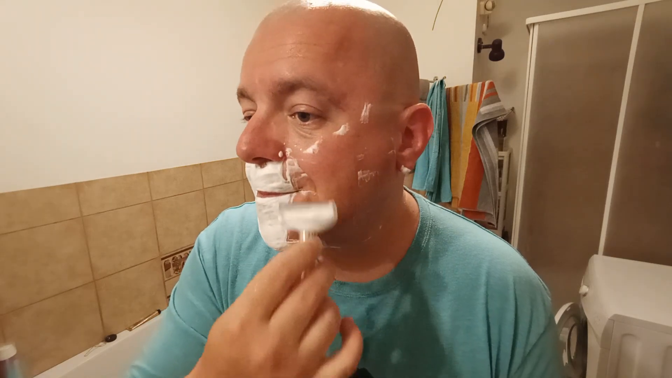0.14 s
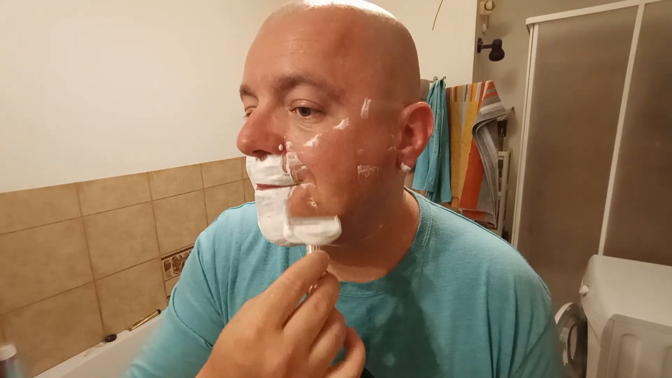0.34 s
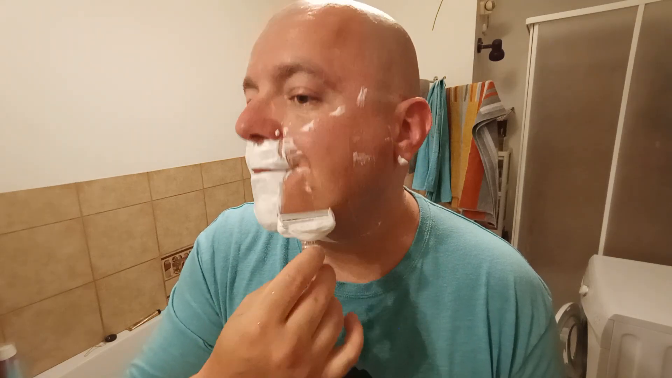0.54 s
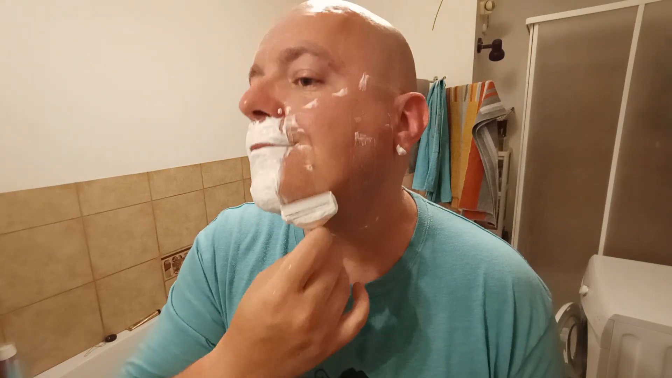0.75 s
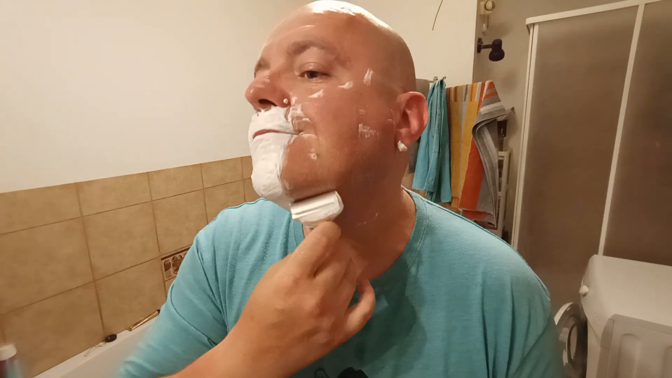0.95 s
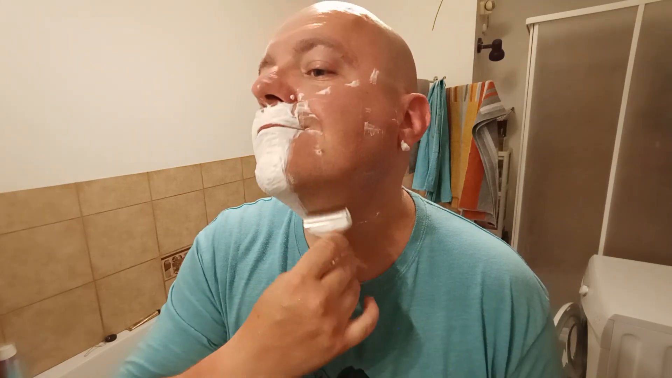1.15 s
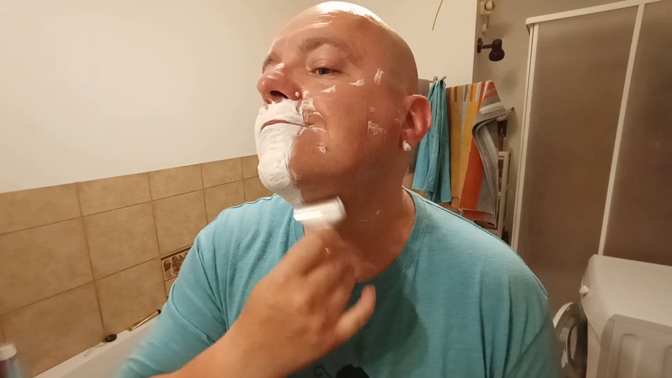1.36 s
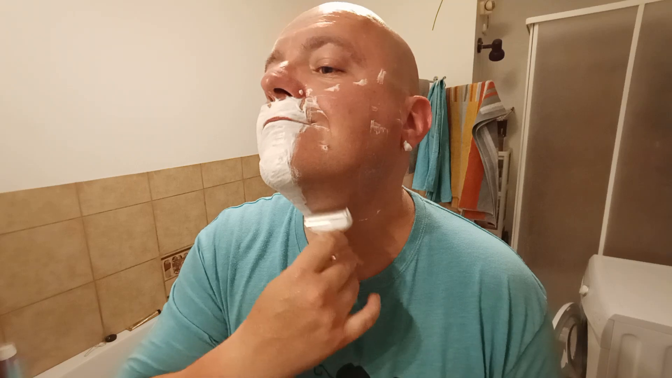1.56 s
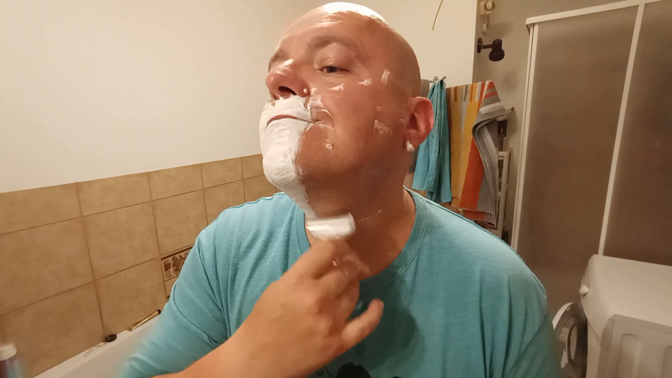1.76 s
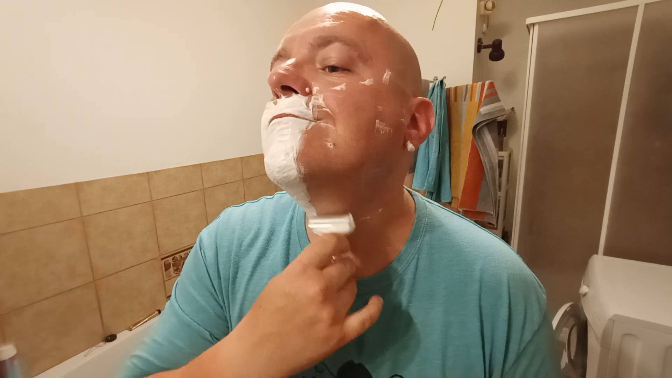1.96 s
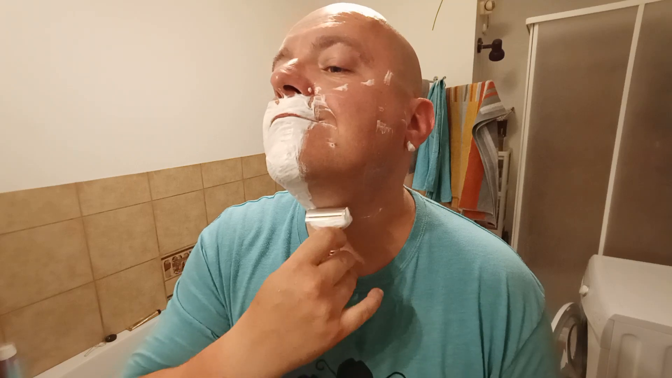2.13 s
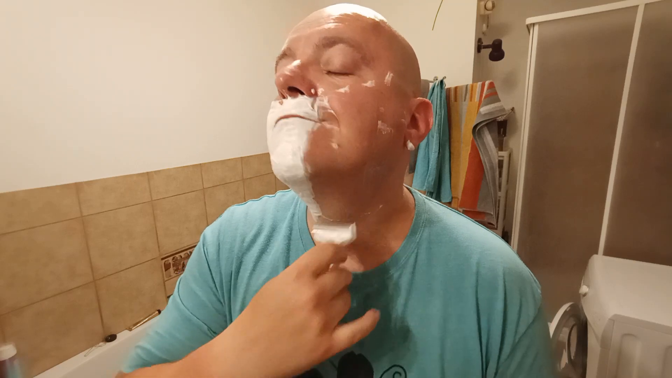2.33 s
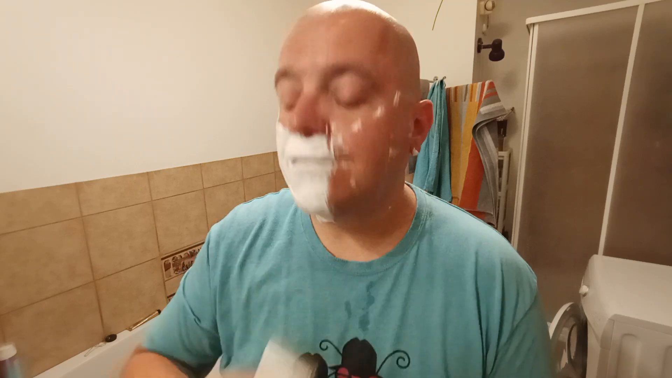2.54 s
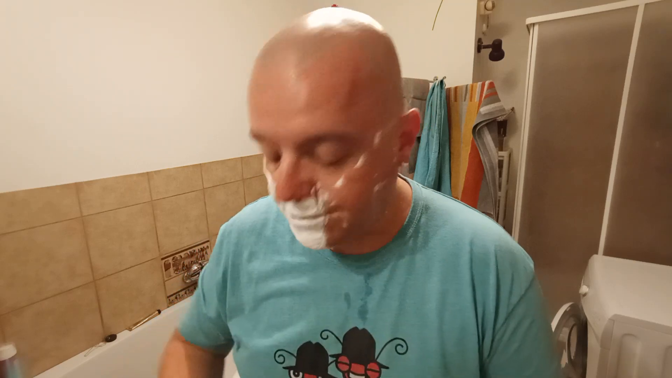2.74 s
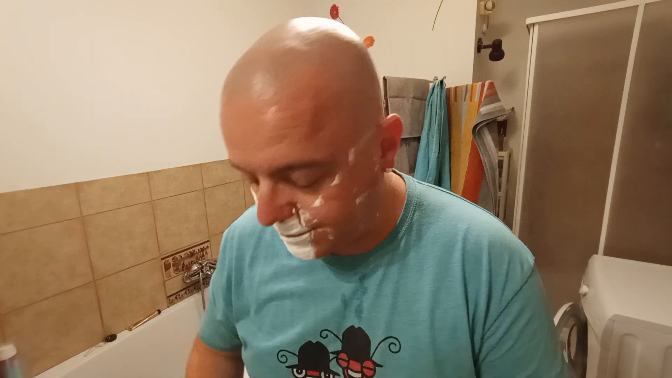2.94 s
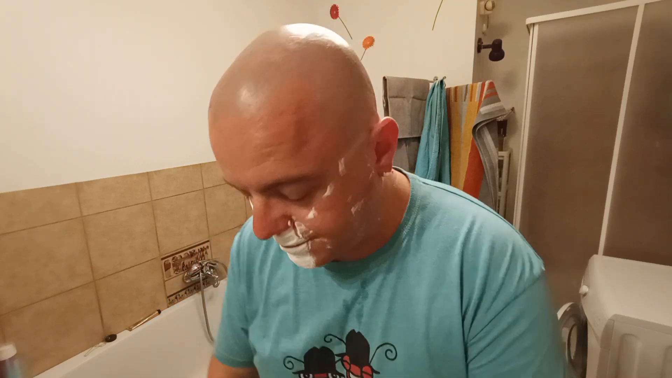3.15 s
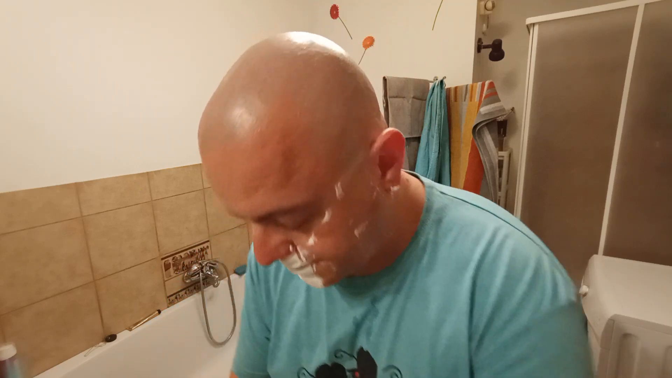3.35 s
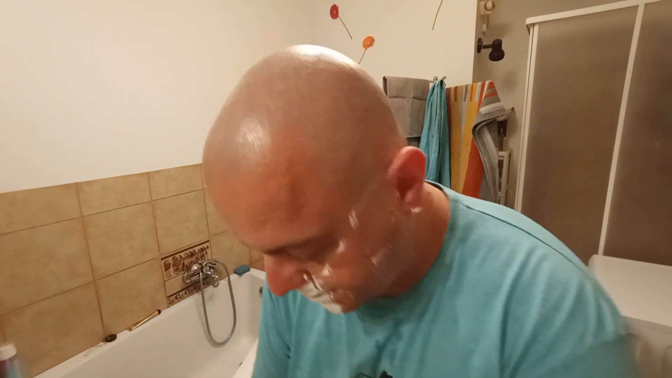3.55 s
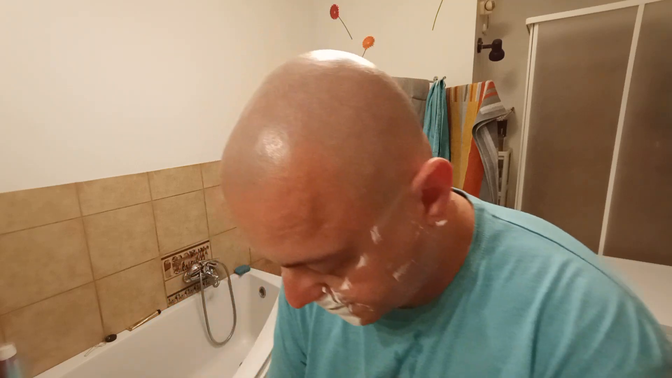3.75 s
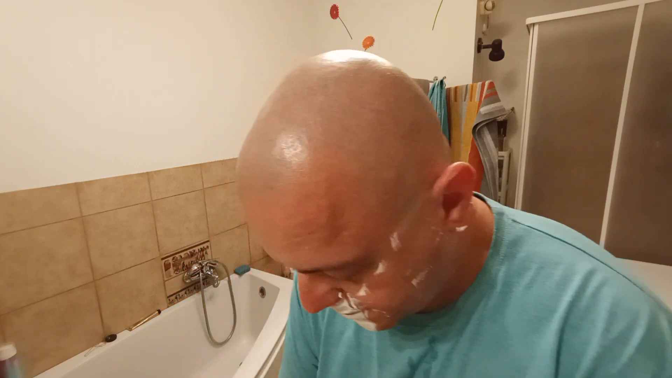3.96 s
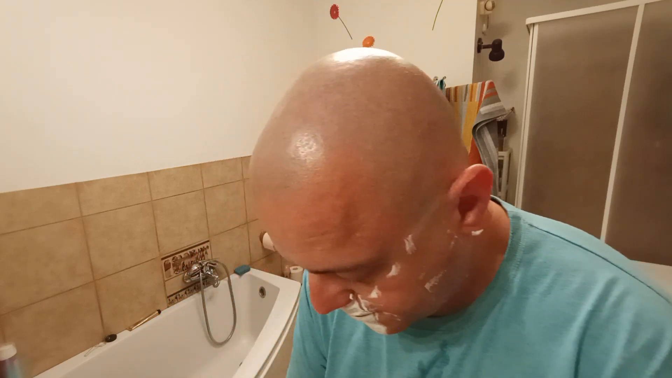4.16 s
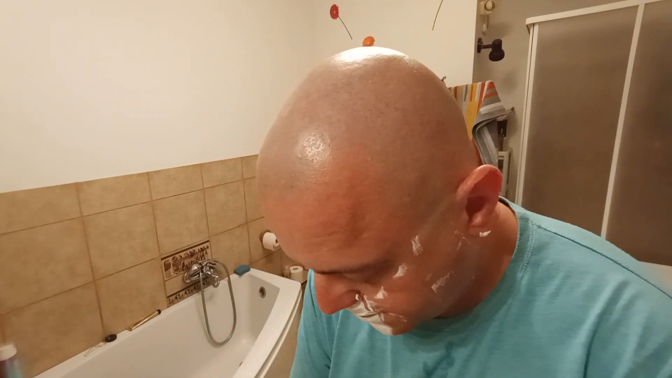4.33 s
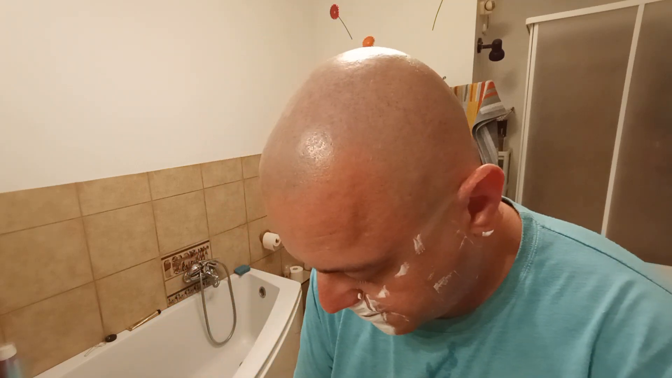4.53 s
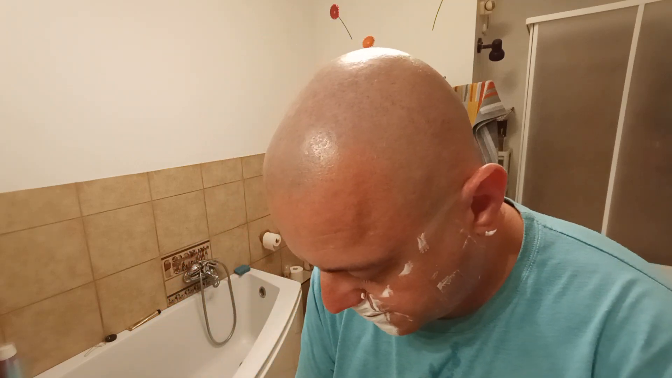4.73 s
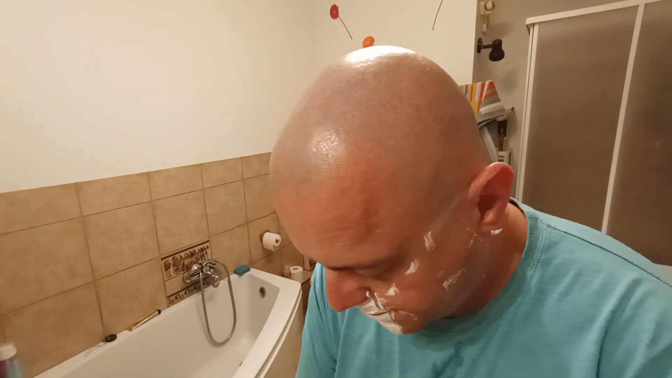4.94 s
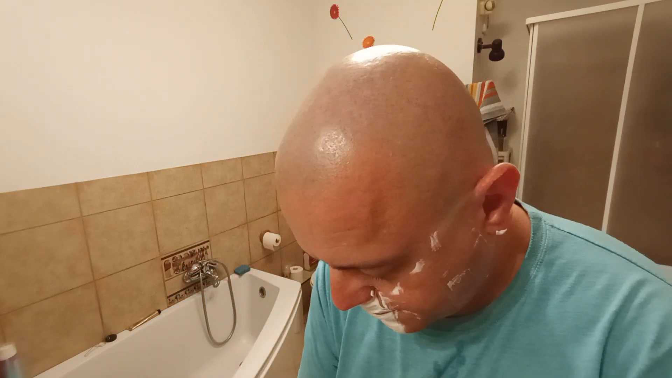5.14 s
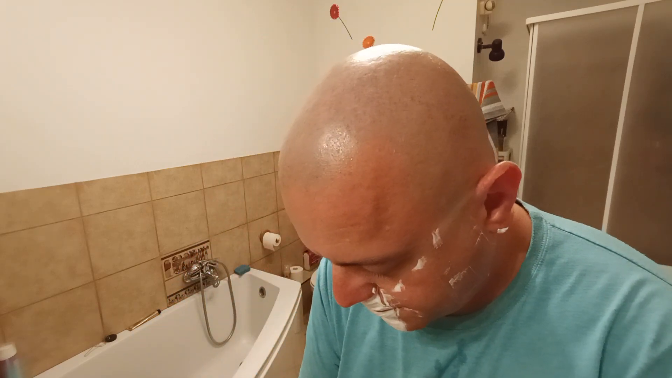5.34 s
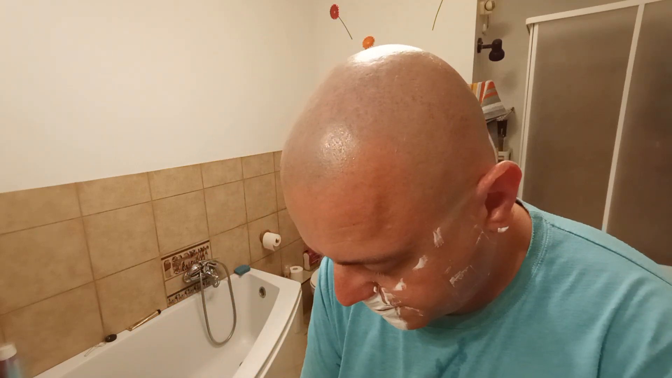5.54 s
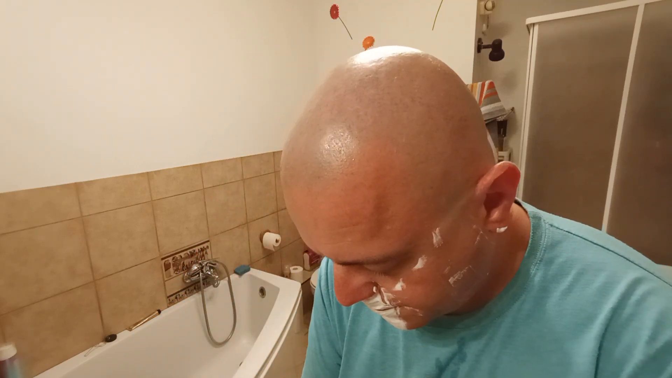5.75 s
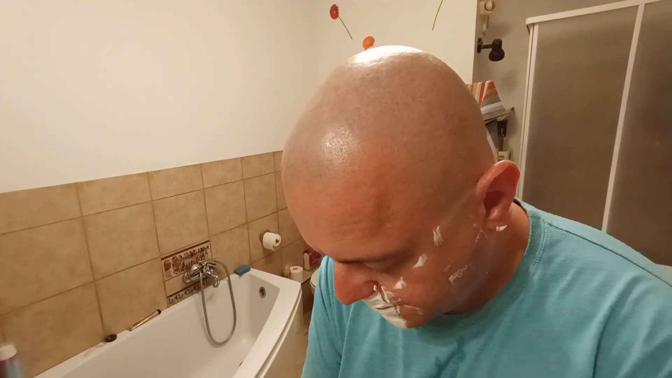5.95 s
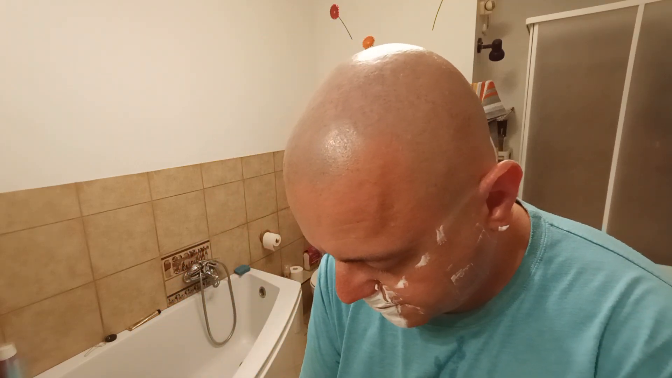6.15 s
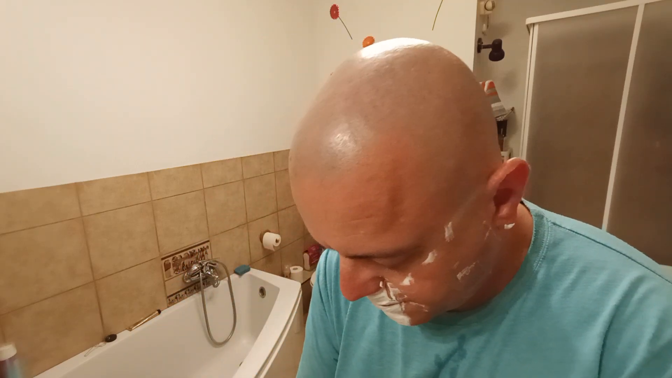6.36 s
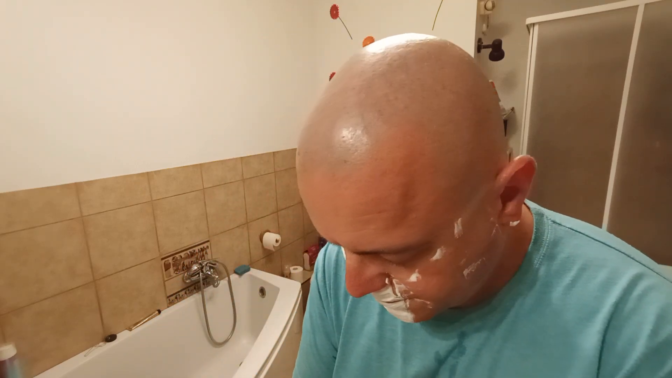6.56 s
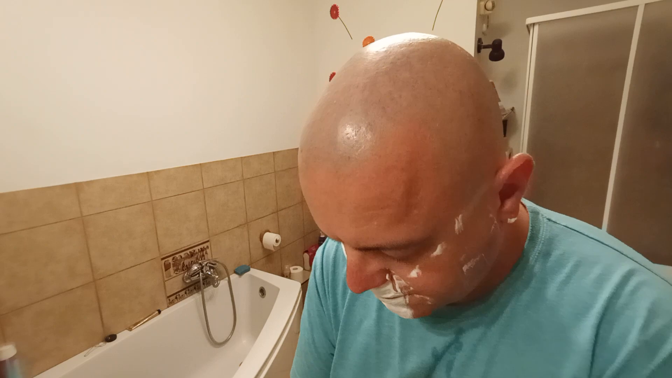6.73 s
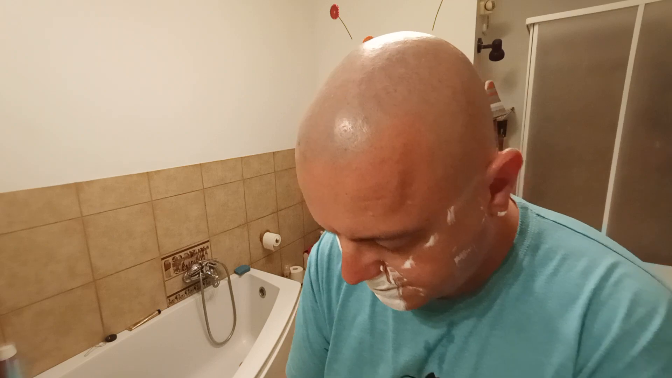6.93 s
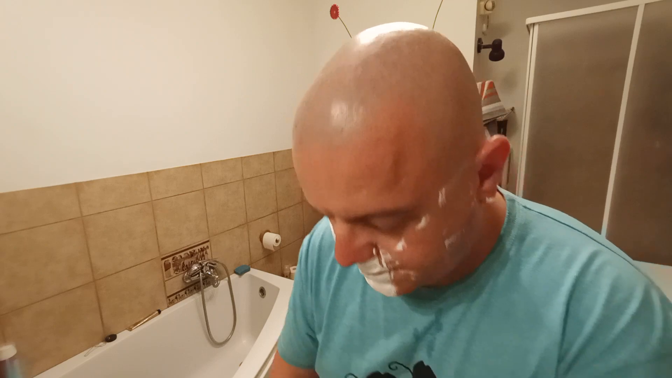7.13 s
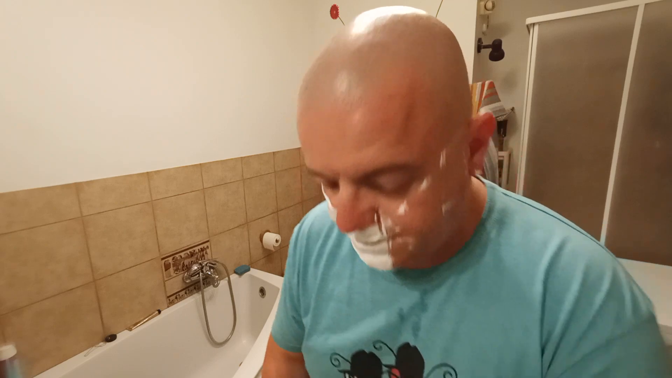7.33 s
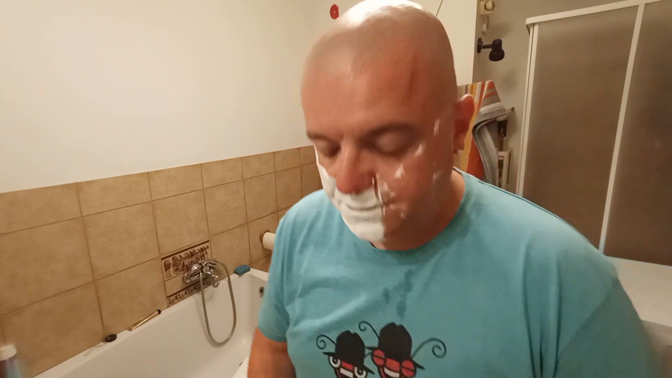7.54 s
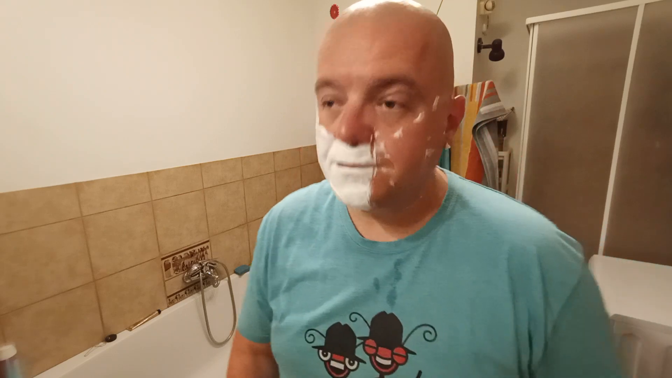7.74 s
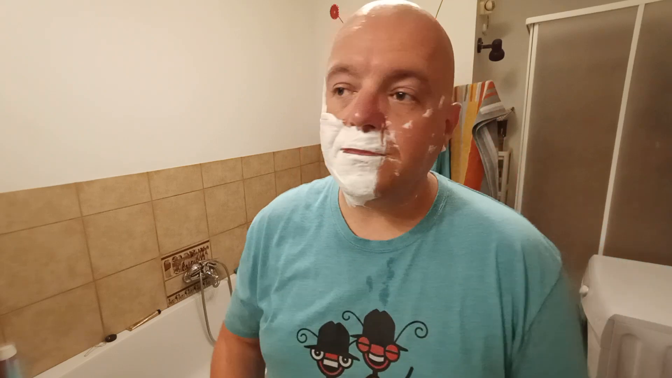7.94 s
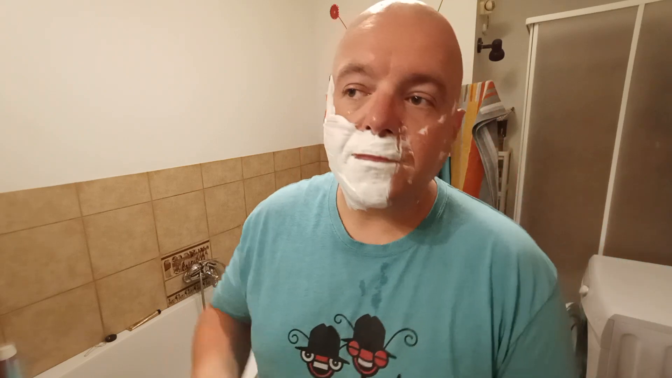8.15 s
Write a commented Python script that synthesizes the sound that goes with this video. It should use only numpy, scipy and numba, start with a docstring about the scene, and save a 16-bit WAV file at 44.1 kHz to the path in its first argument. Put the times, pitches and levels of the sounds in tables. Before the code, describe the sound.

Close, crisp shaving strokes with rustling cloth, soft swishes, then a bubbling stream of tap water that shuts off into last plinks and faint fizz.

```python
"""Wet shave at a bathroom basin

Close by in a small tiled bathroom, a safety razor scrapes through lathered stubble: noise and random clicks
colour the head and the snapping hairs, in a few quick strokes and one long one, while cloth rustles.
After three soft swishes of fine friction a tap hisses and opens; clicks and ringing bubbles make the stream,
the churn and the gulps as the razor is rinsed. The tap shuts, the last drops ring, a fourth swish passes
and a faint wet fizz stays over the steady noise of the quiet room."""
import sys
import numpy as np
from scipy import signal
from scipy.fft import rfft, irfft
from scipy.io import wavfile
from scipy.ndimage import uniform_filter1d
from numba import njit

SR = 44100
rng = np.random.default_rng(int(sys.argv[2]) if len(sys.argv) > 2 else 0)


def wrap_up_sound(samples):
    """Save the sound to the file named by the first command line argument, as 16-bit audio."""
    columns = np.atleast_2d(samples).T
    # keep every value between -1 and 1, then stretch to whole-number steps
    tamed = np.clip(columns, -1, 1)
    steps = np.round(tamed * 32767).astype(np.int16)
    wavfile.write(sys.argv[1], SR, steps)


N = 361179
TIME = np.arange(N) / SR

# All levels are relative: each layer adds its own trim, and the room shares out direct and echoed sound.

# Air of the room. Each row: frequency in Hz, level in dB.
AIR = [(15, -45), (25, -36.5), (60, -6.5), (120, -8.5), (220, -15), (420, -17), (800, -17), (1400, -22.5),
       (2100, -20), (3800, -28), (6700, -31), (8500, -55), (15500, -52.5)]
AIR_DB = -67.5
# Difference of the room between the two microphones. Each row: frequency in Hz, side minus mid in dB.
WIDTH = [(60, 1), (140, -6), (300, -6), (700, 1), (1500, 3), (4000, 5.5)]
ROOM_T60_S, ROOM_TOP_T60_S = 0.29, 0.4

# Razor strokes. Each row: start in seconds, length in seconds, scrape level in dB,
# growth from start to end in dB, bulge of the middle in dB, crispness of the cut in dB.
STROKES = [(-.01, 0.11, -51, -8, 0, -12), (0.368, 0.058, -55, 14, 1.5, -20),
           (0.456, 0.081, -65.5, -11, -0.5, -9), (0.72, 0.22, -63.5, -5, -0.5, -23),
           (0.867, 0.45, -53, 7, -4, -9), (1.577, 0.2, -58, -4, 10, -7.5), (1.995, 0.11, -58.5, 3, 9, -9.5),
           (2.294, 0.078, -54.5, -11, -0.5, -10)]
STROKE_ATTACK_S, STROKE_RELEASE_S = 0.024, 0.016
CRISP_GROWTH_DB = 5  # the cut gets crisper towards the end of each stroke
# Ring of the razor head. Each row: frequency in Hz, width in Hz, boost in dB.
HEAD_PEAKS = [(1655, 88, 5), (1880, 99, 8), (2152, 120, 8.5), (2490, 130, -1.5), (3500, 100, 3.5)]
# Body of the razor head. Each row: frequency in Hz, level in dB.
HEAD = [(700, -42), (1200, -22), (1440, -10.5), (2000, -8.5), (2500, -3.5), (3000, -10.5), (4500, -17.5),
        (8000, -39.5)]
# Snap of the hairs. Each row: frequency in Hz, level in dB.
SNAP = [(1500, -21.5), (3000, -0.5), (4500, 2), (6800, -0.5), (8200, -9.5), (10500, -21.5), (14000, -12.5),
        (15500, -14)]
# Loudest single hairs that catch on the blade. Each row: time in seconds, level in dB.
CATCHES = [(.156, -48), (0.367, -51), (.424, -52), (.528, -54), (.641, -57), (0.679, -51), (0.7353, -45),
           (0.755, -52), (.791, -51), (.84, -52), (1.496, -55), (2.0, -47), (2.305, -50)]
# Tone of the blade. Each row: frequency in Hz, level in dB.
BLADE = [(1200, -28), (2150, -8), (2900, -7), (4800, -14), (5900, -6.5), (7000, -10.5), (10000, -26),
         (15000, -16)]
# Resonances of the blade. Each row: frequency in Hz, width in Hz, boost in dB.
BLADE_PEAKS = [(2145, 90, 16), (3080, 120, 8), (6000, 700, 7)]
# before the long stroke the blade skates lightly over single hairs, pressing harder up to SKATE_DB
SKATE_S, SKATE_LENGTH_S, SKATE_DB, SKATE_GROWTH_DB = 0.437, 0.42, -68.5, 10.5
# the blade steps from hair to hair; the jitter is a share of one step
STEP_HZ, STEP_JITTER, STEP_SCATTER_DB = 55, .7, 11
# every hair ticks at its own pitch; the level is against the rub of the blade
TICK_LOW_HZ, TICK_HIGH_HZ, TICK_CYCLES, TICK_DB = 5270, 6450, 32, -3
# the guard sings in fits as it slides
SING_HZ, SING_WIDTH_HZ, SING_DB, SING_FLUTTER_DB = 2130, 80, -72, 6

# Moves of the arm that rustle the shirt. Each row: start in seconds, length in seconds, level in dB.
MOVES = [(0.234, 0.15, -72), (0.497, 0.25, -77.5), (1.14, 0.24, -69), (1.574, 0.11, -67),
         (2.553, 0.32, -71.5)]
MOVE_ATTACK_S, MOVE_RELEASE_S = 0.059, 0.11
# Tone of the cloth. Each row: frequency in Hz, level in dB.
CLOTH = [(40, -8), (70, -11), (130, -7), (220, -3), (550, -3), (1100, -11), (2000, -18), (6000, -43)]
# Light brushes of hand and sleeve. Each row: start in seconds, length in seconds, level in dB.
BRUSHES = [(0.264, .09, -70.5), (2.6, .07, -72)]
# Tone of the brushes. Each row: frequency in Hz, level in dB.
BRUSH = [(300, -16), (600, -4), (900, 3), (1200, -3), (2000, -5), (6000, -30)]
# Dull bumps of the shifting arm and body. Each row: time in seconds, level in dB, pitch in Hz.
BUMPS = [(.82, -58, 380), (1.2, -53.5, 340), (1.35, -54, 400), (1.67, -54, 546), (1.95, -59, 108),
         (2.32, -57, 330), (2.39, -62, 110), (2.93, -55, 318), (2.99, -57, 110), (3.15, -59, 180)]
BUMP_CYCLES = 13

# Soft swishes as the arm comes down and rises again.
# Each row: start in seconds, level in dB, rise in seconds, hold in seconds, fade in seconds.
SWISHES = [(2.683, -57, 0.03, .064, .02), (2.849, -57.5, 0.0014, 0.021, 0.026),
           (3.035, -58.5, 0.0011, 0.03, .026), (7.993, -64.5, 0.047, 0.089, 0.046)]
# Tone of the swishes. Each row: frequency in Hz, level in dB.
SWISH = [(500, -4), (1000, -12), (1600, -1.5), (2500, 0.5), (4200, -6), (6600, -6), (8800, -32.5),
         (15000, -35)]

# Pockets of air in the opening tap. Each row: start in seconds, length in seconds, level in dB.
PUFFS = [(3.303, 0.089, -57.5), (3.406, 0.044, -46), (3.496, 0.18, -56.5)]
PUFF_ATTACK_S, PUFF_RELEASE_S = 0.0055, 0.014
# Tone of the spout. Each row: frequency in Hz, level in dB.
SPOUT = [(50, -13), (150, 4), (400, 5.5), (700, -3), (1200, -12), (2300, -15), (3200, -30), (6500, -34),
         (8500, -59)]
# Tone of the valve. Each row: frequency in Hz, level in dB.
VALVE = [(2000, -19), (3700, -7), (4600, 0), (5400, -7), (6700, -13), (8500, -36)]
VALVE_S, VALVE_DB = 3.31, -70.5  # the valve hisses until the water arrives

# Gulps, bubbles and drops. Each row: start in seconds, peak level in dB, pitch in Hz, cycles of ring,
# pitch rise as a share, left minus right in dB.
PLOPS = [(3.413, -32.5, 397, 9, 0.01, -4), (3.426, -39, 477, 7, 0, 0), (3.436, -40.5, 246, 4, 0, 0),
         (3.446, -39, 208, 5.7, 0, 2), (3.495, -43, 170, 9.8, 0, 0), (3.779, -30, 895, 18, 0.1, -2),
         (4.043, -23, 2620, 31, 0, -4), (4.211, -18, 2160, 30, 0.23, -4), (4.212, -27, 1730, 28, 0.38, 0),
         (4.374, -26, 890, 27, 0, -1), (4.378, -27, 1770, 35, 0.16, 2), (4.455, -24, 3080, 30, 0.24, 0),
         (4.492, -31, 423, 16, 0.3, 3), (4.581, -25, 2400, 30, 0.42, 3), (4.626, -22.5, 656, 83, 0.92, 6.5),
         (4.811, -29.5, 315, 18, .1, -0.5), (4.858, -20, 320, 13.6, 0.11, -1),
         (4.893, -19.5, 2540, 34, 0, -1.5), (4.918, -26.5, 546, 6.4, 0.76, -11),
         (4.932, -6, 640, 8.4, 0.17, 5.5), (4.99, -26, 503, 15, 0.035, 12), (5.204, -27, 990, 56, 0.13, 6),
         (5.219, -29.5, 391, 48, 0.056, -2), (5.257, -21, 1277, 43, 0.011, 3),
         (5.275, -36, 1310, 104, 0.5, 3), (5.297, -28, 2380, 37, 0.1, 0), (5.334, -26.5, 927, 45, 0.15, 6),
         (5.415, -27, 1400, 38, 0.059, 2), (5.436, -17.5, 874, 15, 0.13, 4),
         (5.448, -31, 1180, 45, 0.076, 2), (5.479, -38, 870, 22, 0.2, 1), (5.535, -24.5, 977, 31, 0.45, 0),
         (5.566, -26.5, 1370, 50, 0.077, 0), (5.598, -29, 1400, 60, 0.2, 2), (5.62, -26, 2580, 90, 0.05, 0),
         (5.635, -25, 740, 42, 0.5, 5), (5.665, -24.5, 905, 35, 0.16, 2), (5.665, -28, 2240, 80, 0.05, 2),
         (5.672, -26, 1430, 40, 0.05, 0), (5.699, -31, 980, 30, 0.1, 1), (5.734, -21.5, 2450, 55, 0.099, 2),
         (5.853, -23, 394, 15, 0.092, -3), (5.878, -23, 333, 9.4, 0.16, -1),
         (5.952, -22, 480, 65, 0.029, 5.5), (5.961, -26, 1300, 51, 0.25, 6), (5.996, -25, 2660, 30, .1, -6),
         (6.188, -34, 895, 28, 0.05, 8), (6.266, -26, 2520, 28, 0.2, 2), (6.296, -26, 2400, 32, 0, -5),
         (6.417, -26.5, 1400, 29, 0, 2), (6.65, -37, 327, 28, 0.23, -1), (7.025, -26, 915, 18, 0.42, 12),
         (7.027, -20, 2480, 8.8, 0.1, 3), (7.126, -43, 196, 4.9, 0.78, 0),
         (7.248, -39, 250, 11, 0.16, -4.5), (7.3024, -24, 6540, 40, 0.07, 7),
         (7.3108, -27, 5670, 43, 0.1, -15), (7.3262, -28.5, 5750, 30, 0.11, 14),
         (7.3756, -33, 3880, 60, 0.15, 0.5), (7.435, -33.5, 2500, 21, 0.3, 4),
         (7.645, -53, 3700, 70, 0, -0.5), (7.657, -60, 3400, 200, 0, 0),
         (8.1533, -43.5, 5840, 36, 0.29, -17)]

# the stream: a first thin jet, then full flow; it swells as the tap is throttled and dies away
JET_S, JET_RISE_S, JET_DB = 3.626, 0.052, -43
FULL_S, FLOW_RISE_S, FLOW_DB = 3.763, 0.0099, -35.5
THROTTLE_DB, STOP_S, STOP_DB_PER_S = 2, 7.179, 137
SHUT_S, SHUT_LENGTH_S = 6.914, 0.38
# Tone of the splash. Each row: frequency in Hz, level in dB.
SPLASH = [(300, -25), (550, -13), (750, -5), (1000, -1), (1180, -4.5), (1350, 1), (1650, -6.5), (2100, -1),
          (2600, 1.5), (3500, -3), (4300, -7), (6600, 0.5), (8300, -19), (11500, -23.5), (15000, -18.5)]
# Middle band of the splash. Each row: time in seconds, level in dB.
SPLASH_MIDS = [(3.75, -2), (4.25, -1.5), (5.0, 1), (5.65, 0.5), (6.05, 0.5), (6.4, 0), (7.1, -1)]
MIDS_LOW_HZ, MIDS_HIGH_HZ = 1100, 2800
# Lone bubbles that ring out above the stream. Each row: rate per second, lowest pitch in Hz,
# highest pitch in Hz, nominal cycles of ring, level against the stream in dB.
PINGS = [(27.97, 565, 1610, 32, -12), (44.5, 1700, 3800, 55, -12)]
# wander of the bubbles where the stream strikes, of the gouts it comes in, and of the heaving pool
WOBBLE_DB, WOBBLE_HZ = 0.5, 14
GOUT_DB, GOUT_HZ, HEAVE_DB, HEAVE_HZ = 1.5, 24, 1.6, 13
# Water churning in the basin. Each row: time in seconds, level in dB.
CHURN = [(3.61, -51), (3.68, -46), (3.88, -39), (4.2, -41.5), (5.2, -38.5), (6.05, -39.5), (6.45, -46),
         (7.14, -45), (7.3, -60.5)]
# Tone of the churn. Each row: frequency in Hz, level in dB.
GURGLE = [(70, -29.5), (130, -23), (185, -8), (260, -5.5), (340, -1), (550, 0), (720, -2.5), (1100, -9.5)]
# Swirls of the razor under the stream. Each row: start in seconds, length in seconds, churn level in dB.
RINSES = [(4.794, .11, -34.5), (5.833, 0.18, -37)]
RINSE_ATTACK_S, RINSE_RELEASE_S = 0.012, 0.055
# Resonances of the basin. Each row: frequency in Hz, width in Hz, boost in dB.
BASIN = [(143, 18, 2.5), (182, 25, 1.5), (211, 18, 2.5), (319, 40, 0), (392, 45, 3.5), (470, 40, -1),
         (532, 35, 3.5), (657, 40, 0.5), (770, 57, -10), (915, 78, 10), (1390, 66, -2), (1990, 89.6, 4.5)]
SLOSH_SHARE, SLOSH_HZ = .014, 11  # how far and how fast the sloshing water detunes them
# The basin at the two microphones. Each row: frequency in Hz, left minus right in dB.
BASIN_PAN = [(200, 0), (380, 1), (700, 5.5), (1300, 1.5), (2400, 1.5), (5000, 0), (15000, -1)]
# Brighter spatter of the throttled jet before it stops. Each row: frequency in Hz, level in dB.
SPATTER = [(500, -12), (1200, -1), (1800, -2), (2400, -9), (3400, 2), (4500, -5), (8500, -34)]
SPATTER_S, SPATTER_LENGTH_S, SPATTER_DB = 6.92, 0.25, -36
SPATTER_RISE_S, SPATTER_FADE_S = 0.059, 0.032

# Tone of the draining fizz. Each row: frequency in Hz, level in dB.
FIZZ = [(100, -6.5), (200, 0), (630, -3), (1400, -14), (2500, -10), (4000, -8), (6700, -7.5), (8600, -44),
        (15000, -44.5)]
# once the tap is shut, a burst of fizz sinks to a faint lasting level
DRAIN_S, DRAIN_DB, DRAIN_FADE_S, DRAIN_REST_DB = 7.33, -54, 0.17, -68.5
# Modes rung by a last drop on the drain. Each row: frequency in Hz, peak level in dB, cycles of ring.
DRIP = [(1230, -48.5, 320), (1260, -55, 380), (1330, -50, 55), (2820, -69, 600)]
DRIP_S, DRIP_PAN_DB = 7.519, 11.5

TOP_HZ = 15650


def undb(db):
    """Decibels to gain."""
    return 10 ** (np.asarray(db) / 20)


def unit(x):
    """Scale to rms 1."""
    return x / np.sqrt(np.mean(x ** 2))


def envelope(s, db):
    """Gain along a level curve, fading to next to nothing just outside it."""
    return undb(np.interp(TIME, np.r_[s[0] - .02, s, s[-1] + .02], np.r_[-110, db, -110]))


def burst(s, length, attack, release):
    """Gain that rises from s, holds until length has passed, then dies away exponentially."""
    return np.clip((TIME - s) / attack, 0, 1) * np.exp(-np.maximum(TIME - s - length, 0) / release)


def progress(s, length):
    """Runs from 0 to 1 over an event."""
    return np.clip((TIME - s) / length, 0, 1)


def waver(rate_hz):
    """Smooth random wander about zero, with a spread a little above one half."""
    knots = rng.standard_normal(2000)
    return 0.68 * np.interp(TIME * rate_hz, np.arange(len(knots)), knots)


def colour(x, points, peaks=(), size=4096):
    """Causal filter from (Hz, dB) points with (Hz, width, dB) resonances on top."""
    hz = np.fft.rfftfreq(size, 1 / SR)
    at, db = np.transpose(points)
    db = np.interp(np.log(hz + 1), np.log(at), db)
    db = db + sum(boost / (1 + (2 * (hz - f) / width) ** 2) for f, width, boost in peaks)
    # folding the cepstrum forward gives minimum phase
    cepstrum = irfft(np.log(undb(db)))
    cepstrum[1:size // 2] *= 2
    cepstrum[size // 2 + 1:] = 0
    return signal.fftconvolve(x, irfft(np.exp(rfft(cepstrum))))[:len(x)]


def diffuse(count):
    """Stereo noise from all sides; its likeness at the two microphones varies with frequency."""
    mid, side = rfft(rng.standard_normal((2, count)))
    at, db = np.transpose(WIDTH)
    share = undb(np.interp(np.log(np.fft.rfftfreq(count, 1 / SR) + 1), np.log(at), db))
    return irfft(np.array([mid + share * side, mid - share * side]) / np.hypot(1, share), count)


def room(x, wet_db, pan_db=0, count=1, size=22000):
    """Direct sound plus the tiles' dense echo; a source wanders among count spots, each with its own echo."""
    t, knots = TIME[:size], np.arange(0, TIME[-1] + .05, .05)
    visits = rng.random((len(knots), count)) ** 2 + 1e-3
    shares = np.array([np.interp(TIME, knots, v) for v in visits.T])
    shares /= np.sqrt(np.sum(shares ** 2, axis=0))
    x = np.broadcast_to(x, (2, N))
    out = x * undb([[pan_db / 2], [-pan_db / 2]])
    for share in shares:
        noise = diffuse(size)
        low = signal.sosfilt(signal.butter(1, 4000, fs=SR, output="sos"), noise)
        # the treble lingers longer
        tail = low * undb(-60 * t / ROOM_T60_S) + (noise - low) * undb(-60 * t / ROOM_TOP_T60_S)
        tail = tail * (t > .003)
        echo = signal.oaconvolve(x * share, unit(tail) / np.sqrt(size), axes=1)[:, :N]
        out = out + undb(wet_db) * echo
    return out / np.hypot(1, undb(wet_db))


def clicks(rate, spread_db):
    """Random clicks, many small and a few large; rms 1."""
    sizes = undb(spread_db * np.minimum(rng.exponential(size=N), 4)) * rng.choice([-1, 1], N)
    return unit((rng.random(N) < rate / SR) * sizes)


@njit
def ring(s, size, hz, cycles, rise):
    """Ringing tones: each swells in about a cycle, may rise in pitch and dies by 60 dB over its cycles."""
    out = np.zeros(N)
    for k in range(len(s)):
        start, length = int(s[k] * SR), int(cycles[k] * SR / hz[k])
        for i in range(min(length, N - start)):
            age = i / length
            turns = cycles[k] * age * (1 + rise[k] * age / 2)
            swell = 1 - np.exp(-(turns / 1.3) ** 2)
            decay = np.exp(-6.9 * (age - 2 / cycles[k]))
            out[start + i] += size[k] * swell * decay * np.sin(2 * np.pi * turns)
    return out


def bubbles(rate, low_hz, high_hz, cycles, spread_db):
    """A cloud of bubbles ringing at random times, pitches and sizes; rms 1."""
    when, pitch, big, life = rng.random((int(rate * N / SR), 4)).T
    hz = (np.sqrt(low_hz) + pitch * (np.sqrt(high_hz) - np.sqrt(low_hz))) ** 2
    size = hz ** .75 * undb(spread_db * np.minimum(-np.log(1 - big), 5))
    return unit(ring(when * N / SR, size, hz, max(cycles, 5) * (0.8 + life), 0.33 * life))


def air():
    """The steady rumble and hiss of the quiet room, as coloured noise from all sides."""
    return unit(np.array([colour(side, AIR) for side in diffuse(N)])) * undb(AIR_DB)


def razor():
    """The blade snaps hairs in dense random clicks; each snap ticks and rings the head, some catch singly."""
    scrape, cut = pressure()
    # the blade drags unevenly over the skin
    drag = undb(1.4 * unit(uniform_filter1d(rng.standard_normal(N), size=400)))
    hairs = unit(clicks(1100, 1.6) + 0.79 * rng.standard_normal(N)) * drag
    head = unit(colour(hairs, HEAD, HEAD_PEAKS)) * scrape * undb(-2.0)
    snap = unit(colour(hairs, SNAP)) * cut
    catches = np.zeros(N)
    for at, db in CATCHES:
        catches[int(at * SR)] = undb(db + 22.0)
    crackle = colour(catches, BLADE, BLADE_PEAKS) + skate()
    return room(head + snap + crackle, 0.85, pan_db=1.0, count=3)


def pressure():
    """Gains of scrape and snap: in each stroke the blade lands, bears down along an arc and lifts."""
    scrape, cut = 0, 0
    for s, length, db, growth_db, bulge_db, crisp_db in STROKES:
        along = progress(s, length) - .5
        arc_db = db + growth_db * along + bulge_db * np.cos(np.pi * along)
        gain = burst(s, length, STROKE_ATTACK_S, STROKE_RELEASE_S) * undb(arc_db)
        scrape = scrape + gain
        cut = cut + gain * undb(crisp_db + CRISP_GROWTH_DB * along)
    return scrape, cut


def skate():
    """The lightly pressed blade steps over single hairs in a quick patter while its guard sings."""
    touch = burst(SKATE_S, SKATE_LENGTH_S, .03, 0.064)
    press = undb(SKATE_DB + SKATE_GROWTH_DB * (progress(SKATE_S, SKATE_LENGTH_S) - 1.0))
    late, big, pitch = rng.random((int(STEP_HZ * N / SR), 3)).T
    s = (np.arange(len(late)) + STEP_JITTER * late) / STEP_HZ
    hz = TICK_LOW_HZ + pitch * (TICK_HIGH_HZ - TICK_LOW_HZ)
    sizes = undb(STEP_SCATTER_DB * big)
    ticks = unit(ring(s, sizes, hz, TICK_CYCLES * np.ones(len(s)), np.zeros(len(s))))
    rub = unit(colour(clicks(900, 1.8), BLADE, BLADE_PEAKS))
    resonator = signal.iirpeak(SING_HZ, SING_HZ / SING_WIDTH_HZ, fs=SR)
    guard = signal.lfilter(*resonator, rng.standard_normal(N))
    sing = unit(guard) * undb(SING_DB + SING_FLUTTER_DB * waver(30))
    return ((rub + undb(TICK_DB) * ticks) * press + sing) * touch


def rustle():
    """Cloth rubs in fits with the arm, dull and close, with soft ringing bumps and lighter brushes."""
    gain = sum(undb(db) * burst(s, length, MOVE_ATTACK_S, MOVE_RELEASE_S) for s, length, db in MOVES)
    cloth = unit(colour(clicks(1500, 2.3), CLOTH)) * gain * undb(1.7 * waver(22.4))
    touch = sum(undb(db) * burst(s, length, 0.035, .04) for s, length, db in BRUSHES)
    brush = unit(colour(clicks(900, 2.5), BRUSH)) * touch
    s, db, hz = np.array(BUMPS, float).T.copy()
    bumps = ring(s, undb(db - 4), hz, BUMP_CYCLES * np.ones(len(s)), np.zeros(len(s)))
    return room(cloth + brush + bumps, -0.86)


def swishes():
    """Short rubs of fine-grained friction, with more echo than direct sound."""
    gain = sum(undb(db) * burst(s, rise + hold, rise, fade) for s, db, rise, hold, fade in SWISHES)
    return room(unit(colour(clicks(4000, 2.4), SWISH)) * gain * undb(1.5), 1.3)


def spout():
    """The valve hisses unevenly, and pockets of air thump through the opening tap before the water comes."""
    puffs = sum(undb(db) * burst(s, length, PUFF_ATTACK_S, PUFF_RELEASE_S) for s, length, db in PUFFS)
    hiss = unit(colour(rng.standard_normal(N), VALVE)) * undb(VALVE_DB)
    valve = hiss * undb(3.0 * waver(25.55)) * burst(VALVE_S, JET_S - VALVE_S, 0.036, 0.054)
    return room(unit(colour(clicks(2000, 3.2), SPOUT)) * puffs + valve, 0.92)


def plops():
    """Pockets of air gulp as the razor is rinsed; the last drops plink after the tap shuts."""
    s, db, hz, cycles, rise, pan_db = np.array(PLOPS, float).T.copy()
    pair = np.array([ring(s, undb(db + side * pan_db / 2), hz, cycles, rise) for side in (1, -1)])
    highpass = signal.butter(2, 140, "high", fs=SR, output="sos")
    return room(signal.sosfilt(highpass, pair), -1.4, count=3)


def tap():
    """The stream bursts in gouts into spray and small bubbles; larger ones churn in the pool."""
    wobble = undb(WOBBLE_DB * waver(WOBBLE_HZ))
    spray = unit(clicks(5000, 3.0) + 0.61 * bubbles(1600, 489.4, 5130, 16.8, 2.02) * wobble)
    pings = sum(undb(db) * bubbles(rate, low, high, cycles, 1.1) for rate, low, high, cycles, db in PINGS)
    splash = (basin(spray, SPLASH) + pings) * flow() * undb(4.0)
    band = signal.butter(2, [MIDS_LOW_HZ, MIDS_HIGH_HZ], "band", fs=SR, output="sos")
    mids = signal.sosfiltfilt(band, splash)
    mids_db = np.interp(TIME, *np.transpose(SPLASH_MIDS)) + GOUT_DB * waver(GOUT_HZ)
    splash = splash + mids * (undb(mids_db) - 1)
    # as the tap shuts, the thinning trickle no longer drums on the basin
    thin = signal.sosfiltfilt(signal.butter(2, 1500, "high", fs=SR, output="sos"), splash)
    splash = thin + (splash - thin) * (1 - progress(SHUT_S, SHUT_LENGTH_S))
    rinse = sum(undb(db) * burst(s, length, RINSE_ATTACK_S, RINSE_RELEASE_S) for s, length, db in RINSES)
    churn = np.hypot(envelope(*np.transpose(CHURN)), rinse) * undb(HEAVE_DB * waver(HEAVE_HZ))
    gurgle = basin(bubbles(550, 77.7, 1000, 9.8, 2.1), GURGLE) * churn * undb(-0.5)
    left, right = room(splash + spatter() + gurgle, 2.38, count=8)
    half = np.array(BASIN_PAN) * [1, .5]
    return np.array([colour(left, half), colour(right, half * [1, -1])])


def flow():
    """Gain of the stream: it opens in two steps, runs steadily, swells when throttled and stops."""
    jet, full = progress(JET_S, JET_RISE_S), progress(FULL_S, FLOW_RISE_S)
    swell_db = THROTTLE_DB * progress(SHUT_S, STOP_S - SHUT_S)
    closing_db = swell_db - STOP_DB_PER_S * np.maximum(TIME - STOP_S, 0)
    return (undb(JET_DB) * jet * (1 - full) + undb(FLOW_DB) * full) * undb(closing_db)


def basin(x, points):
    """Colour by the basin, wandering between lowered and raised resonances as the water sloshes; rms 1."""
    low, high = (colour(x, points, np.array(BASIN) * [1 + way * SLOSH_SHARE, 1, 1]) for way in (-1, 1))
    share = np.clip(.5 + waver(SLOSH_HZ), 0, 1)
    return unit(low + share * (high - low))


def spatter():
    """The narrowing jet breaks up into small, bright drops."""
    drops = unit(clicks(3000, 3.0) + 0.37 * bubbles(700, 1410, 3740, 22, 1.5))
    gain = undb(SPATTER_DB) * burst(SPATTER_S, SPATTER_LENGTH_S, SPATTER_RISE_S, SPATTER_FADE_S)
    return unit(colour(drops, SPATTER)) * gain


def drain():
    """Tiny bubbles burst in the wet basin, sinking to a faint lasting fizz."""
    first = undb(DRAIN_DB) * burst(DRAIN_S, 0.015, 0.013, DRAIN_FADE_S)
    rest = undb(DRAIN_REST_DB) * progress(DRAIN_S, DRAIN_FADE_S)
    foam = unit(clicks(2500, 3.2) + 0.41 * bubbles(900, 309, 7800, 16, 2.9))
    return room(unit(colour(foam, FIZZ)) * (first + rest), 1.75)


def drip():
    """One drop strikes the drain, whose close modes beat as they ring on."""
    hz, db, cycles = np.array(DRIP, float).T.copy()
    modes = ring(np.full(len(hz), DRIP_S), undb(db), hz, cycles, np.zeros(len(hz)))
    return room(modes, -8, pan_db=DRIP_PAN_DB)


def scene():
    """Shaving, then rinsing, in the same small room."""
    return air() + razor() + rustle() + swishes() + spout() + plops() + tap() + drain() + drip()


def record(dry):
    """The microphones' steep low-pass cuts the top."""
    return signal.sosfilt(signal.ellip(10, .2, 70, TOP_HZ, fs=SR, output="sos"), dry)


dry = scene()
out = record(dry)
wrap_up_sound(out)
```